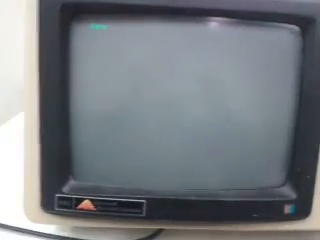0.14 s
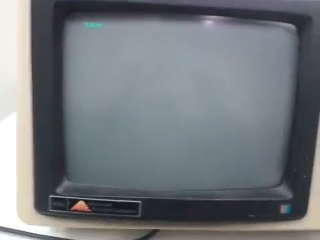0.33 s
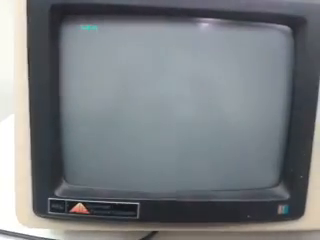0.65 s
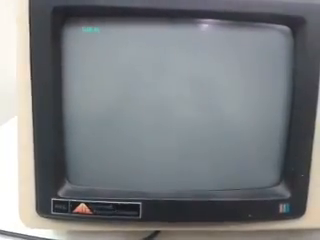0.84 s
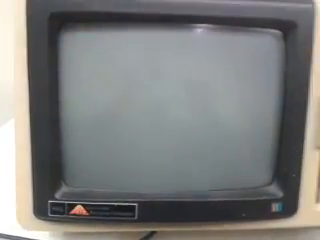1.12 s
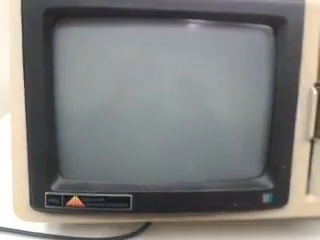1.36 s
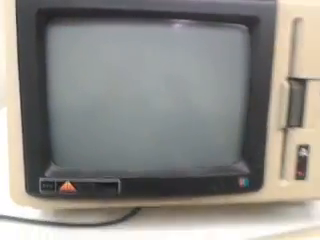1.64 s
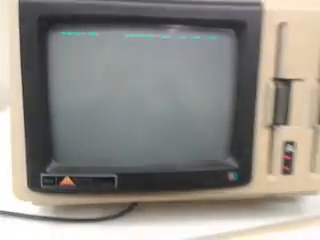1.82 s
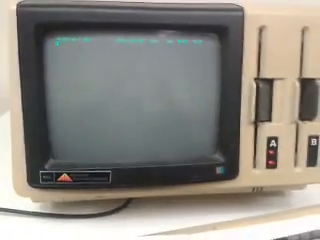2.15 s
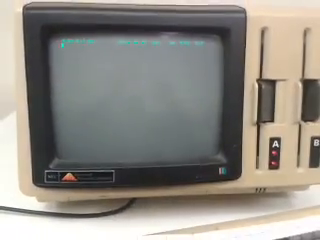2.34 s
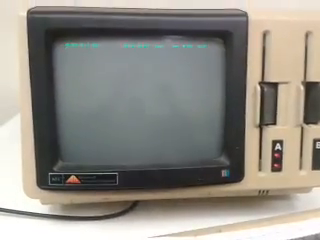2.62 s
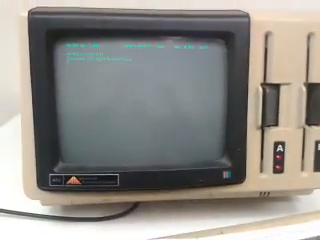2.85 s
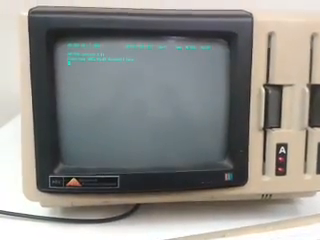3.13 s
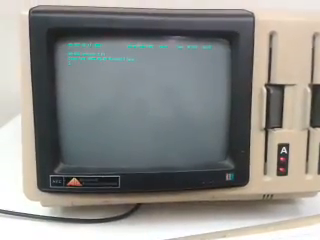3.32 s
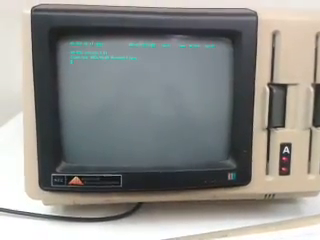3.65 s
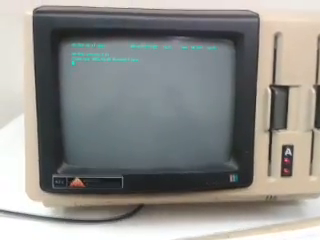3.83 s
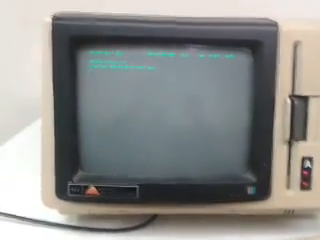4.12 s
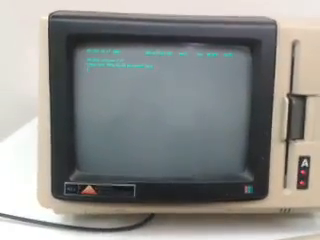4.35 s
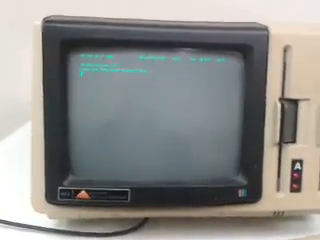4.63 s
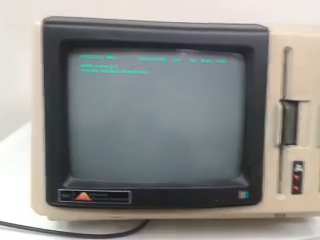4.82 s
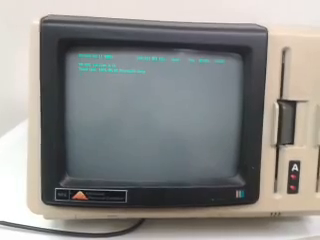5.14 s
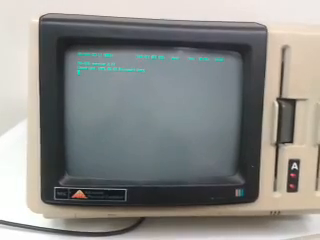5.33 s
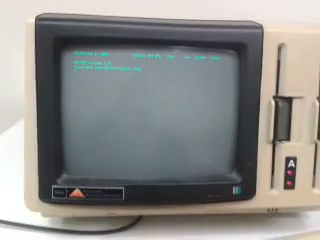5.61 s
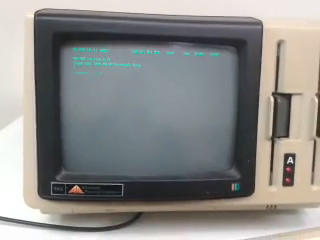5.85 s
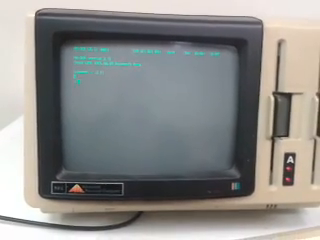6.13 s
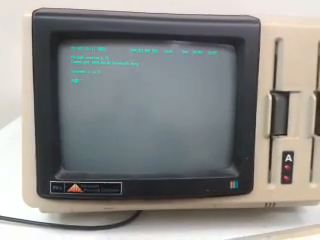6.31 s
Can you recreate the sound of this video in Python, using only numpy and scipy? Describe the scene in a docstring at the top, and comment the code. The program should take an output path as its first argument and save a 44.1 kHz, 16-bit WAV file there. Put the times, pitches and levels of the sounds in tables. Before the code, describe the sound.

An old desktop computer runs close by in a small room, with a faint, steady fan hiss, hum and thin motor whine. Its floppy drive gives short, irregular clicks as the head moves. Two sharper clacks with a slight metallic ring come in the first half, and the later clicks lengthen into tiny rasps. The hand-held microphone picks up soft rubs and a quick cluster of sharp ticks past the middle.

```python
"""Floppy drive of an old desktop computer booting, close by in a small room.
A stepper drags the head a few tracks at a time; twice the head clacks down. Both ring the drive and case.
Underneath: fan air, mains hum, motor whine. The hand-held microphone ticks and rubs as it moves."""
import sys
import numpy as np
from scipy import signal
from scipy.fft import irfft
from scipy.io import wavfile

SR = 44100
rng = np.random.default_rng(int(sys.argv[2]) if len(sys.argv) > 2 else 0)


def waveform_to_disk(signal):
    """Save audio, clipped to [-1, 1], as 16-bit WAV at the path in sys.argv[1]."""
    frames = np.transpose(np.atleast_2d(signal))
    scaled = np.clip(frames, -1, 1) * 32767
    samples = np.round(scaled).astype(np.int16)
    wavfile.write(sys.argv[1], SR, samples)


N = 285309
T = np.arange(N) / SR
RING_SAMPLES, ATTACK_SAMPLES = int(.6 * SR), int(.04 * SR)
RING_T = T[:RING_SAMPLES]
STEP_HZ = 251.67

# fan and room air: freq_hz, density_db
AIR_SPECTRUM = [(15, 17.5), (38, -2), (55, -17), (80, -14), (108, -20.5), (150, -11.5), (280, -0.5),
                (560, 4), (1100, -1), (2400, -5.5), (4500, -12), (7100, -13), (8000, -47.5)]
# mains and fan tones: pitch_hz, level_db
HUM_TONES = [(50, -78), (150, -87), (188, -81), (200, -78), (301, -71), (400, -82.5), (490, -69),
             (587, -63), (4140, -79.5)]
# motor whine: harmonic, level_re_air_db
WHINE_HARMONICS = [(7, -16), (8, -15), (9, -14), (10, -20), (11, -20), (12, -24.5), (13, -20), (14, -23)]
# air and whine at the moving microphone: time_s, gain_db
MACHINE_GAIN = [(0, -57.5), (1.5, -58.5), (3.3, -58), (4.4, -58), (5.3, -60.5), (5.9, -59.5), (6.4, -56.5)]
# microphone ticks: start_s, peak_db, centre_hz
TICKS = [(4.041, -40, 6240), (4.074, -32, 5630), (4.094, -21.5, 4250), (4.136, -17, 4900),
         (5.438, -38.5, 4800)]
# hand rubs and bumps: start_s, length_s, level_db, centre_hz
RUBS = [(0, 0.23, -60, 41), (.01, 0.09, -47, 710), (0.402, 0.59, -58, 806), (1.293, 0.047, -57.5, 6500),
        (1.296, 0.047, -48, 1080), (4.03, 0.078, -51.5, 6650), (4.11, 0.027, -49.5, 6500),
        (4.254, 0.64, -63, 5800), (6.142, 0.39, -58.5, 4570)]
# room reflections: freq_hz, density_db
ROOM_SPECTRUM = [(90, -40.5), (135, 1.5), (230, -25), (350, 9.5), (500, 1.5), (900, 6.5), (2500, -12.5),
                 (7000, -14.5), (9000, -10.5), (10000, -54)]
# room decay: freq_hz, t60_s
ROOM_DECAY = [(130, 0.3), (300, 0.39), (700, 0.24), (1800, 0.25), (6000, 0.24)]
# drive and case modes: pitch_hz, gain_db
CASE_MODES = [(130, -22), (346, -2.5), (440, -13.5), (548, -1), (630, -3), (746, 1), (795, 3), (845, 0.5),
              (985, -12.5), (1080, -7), (1245, -31), (1370, -5.5), (1570, -11), (1675, -4), (1790, -14.5),
              (1995, -9.5), (2155, -11.5), (2260, -19.5), (2530, -5), (2665, -9), (2815, 2.5), (6950, 9)]
# dense resonances of small parts: freq_hz, density_db
PARTS_SPECTRUM = [(120, -59.5), (230, -34), (400, -8), (800, -2), (1500, -8), (2800, -6), (3400, -6),
                  (4800, -8), (6000, -4.5), (7000, -7), (9000, 4), (10000, -34)]
# head arm spring: pitch_hz, gain_db, t60_s
SPRING_MODES = [(2830, -48, .3), (4795, -46, .16), (5828, -58, .75), (5852, -60, .7), (5905, -59, .6)]
# head landings: start_s, chatter_s, level_db
CLACKS = [(2.0546, 0.0034, -25), (3.012, 0.0059, -27.5)]
# head seeks: start_s, length_s, level_db, mid_over_bass_db
SEEKS = [(0.3221, 0.0027, -37.5, -3), (0.8267, 0.0039, -36.5, -2.5), (1.336, 0.0057, -40, 7),
         (1.825, 0.0059, -36, -0.5), (2.139, 0.0089, -34.5, -0.5), (2.5137, 0.0047, -39.5, -2.5),
         (2.971, 0.011, -34.5, 1), (3.4891, 0.014, -32.5, -1), (3.599, 0.02, -33.5, 2),
         (3.749, 0.014, -33, -2), (4.197, 0.0065, -39, -4), (4.604, 0.028, -35, -2.5),
         (4.9271, 0.02, -35, -5.5), (5.5454, 0.0061, -41.5, -7.5), (5.997, 0.029, -35.5, -2),
         (6.246, 0.021, -33.5, -5.5)]


def amp(db):
    """Decibels to gain."""
    return 10 ** (np.asarray(db) / 20)


def unit(x):
    """Scale to rms 1."""
    return x / np.sqrt(np.mean(x ** 2))


def over_pitch(table, hz):
    """Interpolate (freq_hz, value) rows in log frequency."""
    freq_hz, value = np.transpose(table)
    return np.interp(np.log(hz + 1e-9), np.log(freq_hz), value)


def noise(spectrum, samples):
    """Coloured noise, rms 1."""
    hz = np.fft.rfftfreq(samples, 1 / SR)
    phases = np.exp(2j * np.pi * rng.random(len(hz)))
    return unit(irfft(amp(over_pitch(spectrum, hz)) * phases, samples))


def band(x, low_hz, high_hz=SR / 2, order=2):
    """Band-pass."""
    sos = signal.butter(order, [low_hz, min(high_hz, SR / 2 - 1)], "band", fs=SR, output="sos")
    return signal.sosfilt(sos, x)


def fade(t60_s, hold_s=0):
    """Hold, then exponential decay."""
    return np.exp(-np.log(1000) * np.maximum(RING_T - hold_s, 0) / t60_s)


def ring(modes):
    """Damped sines of alternating sign from (pitch_hz, gain_db, t60_s) rows."""
    return sum((-1) ** k * amp(db) * fade(t60_s) * np.sin(2 * np.pi * hz * RING_T)
               for k, (hz, db, t60_s) in enumerate(modes))


def add(out, start_s, x):
    """Mix x into out."""
    i = int(start_s * SR)
    out[i:i + len(x)] += x[:N - i]


def wander(rate_hz):
    """Slow random drift, rms 1."""
    return noise([(rate_hz, 0), (2 * rate_hz, -20), (10 * rate_hz, -120)], N)


def tone(hz, level_db, waver_db=2):
    """Sine whose level wavers as the microphone moves."""
    rms = amp(level_db + waver_db * wander(7.7))
    cycles = np.cumsum(hz) / SR + rng.random()
    return np.sqrt(2) * rms * np.sin(2 * np.pi * cycles)


def running_machine(air_db=4.5, motor_hz=188, hum_drift=0.00251, motor_drift=0.00074):
    """Hum, plus fan air and motor whine that swell together as the microphone moves."""
    air = noise(AIR_SPECTRUM, N)
    hum = sum(tone(hz * (1 + hum_drift * wander(5.15)), db) for hz, db in HUM_TONES)
    pulse_hz = motor_hz * (1 + motor_drift * wander(2.7))
    whine = sum(tone(harmonic * pulse_hz, db) for harmonic, db in WHINE_HARMONICS)
    gain_db = air_db + np.interp(T, *np.transpose(MACHINE_GAIN))
    return hum + (air + whine) * amp(gain_db)


def handling(tick_t60_s=0.007, tick_span=6.0, rub_span=1.12):
    """Hand ticks and rubs on the microphone, too close to stir the room."""
    out = np.zeros(N)
    for start_s, peak_db, hz in TICKS:
        burst = rng.standard_normal(RING_SAMPLES) * fade(tick_t60_s)
        tick = band(burst, hz / tick_span, hz * tick_span, order=1)
        add(out, start_s, amp(peak_db) * tick / np.abs(tick).max())
    for start_s, length_s, level_db, hz in RUBS:
        rub = unit(band(rng.standard_normal(RING_SAMPLES), hz / rub_span, hz * rub_span, order=1))
        swell = np.sin(np.pi * np.minimum(RING_T / length_s, 1))
        add(out, start_s, amp(level_db) * rub * swell)
    return out


def room(build_s=0.026):
    """Diffuse reflections build and fade by octave, bass last."""
    diffuse = noise(ROOM_SPECTRUM, RING_SAMPLES)
    tail = sum(band(diffuse, hz / np.sqrt(2), hz * np.sqrt(2)) * fade(over_pitch(ROOM_DECAY, hz))
               for hz in 125 * 2. ** np.arange(7))
    return tail * (1 - np.exp(-RING_T / build_s))


def case_response(parts_db, parts_t60_s, build_s, room_db, t60_at_1khz_s=.08):
    """One push spreads through the chassis: damped case modes, small parts, then the room."""
    modes = ring([(hz, db, t60_at_1khz_s / np.sqrt(hz / 1000)) for hz, db in CASE_MODES])
    parts = noise(PARTS_SPECTRUM, RING_SAMPLES) * fade(parts_t60_s)
    direct = (unit(modes) + amp(parts_db) * unit(parts)) * (1 - np.exp(-RING_T / build_s))
    return direct + amp(room_db) * unit(room())


def strike(force, response, levels_db, crossovers_hz=(1150, 3200)):
    """A force rings the case; levels_db sets bass, mid and treble over the attack."""
    ringing = signal.fftconvolve(force, response)[:RING_SAMPLES]
    bass, below_treble = (signal.sosfiltfilt(signal.butter(4, hz, fs=SR, output="sos"), ringing)
                          for hz in crossovers_hz)
    bands = bass, below_treble - bass, ringing - below_treble
    return sum(amp(db) * unit(x) * np.std(x) / np.std(x[:ATTACK_SAMPLES])
               for x, db in zip(bands, levels_db))


def head_blows(landing_db=(-7.5, 1, -1.5), rebound_db=(-10, -6.2, -8), gap_s=.02, rebound_s=0.0172):
    """A landing, then a softer, longer rebound: start_s, chatter_s, (bass_db, mid_db, treble_db)."""
    for start_s, chatter_s, level_db in CLACKS:
        yield start_s, chatter_s, level_db + np.array(landing_db)
        yield start_s + gap_s, rebound_s, level_db + np.array(rebound_db)


def head_clacks(spread_db=6.5, settle_t60_s=0.0084, snap_db=-5, snap_hz=(6400, 7000), spring_db=30.5):
    """The light head arm snaps against its stop, chatters and rings its spring."""
    out = np.zeros(N)
    for start_s, chatter_s, levels_db in head_blows():
        chatter = fade(settle_t60_s, hold_s=chatter_s) * rng.standard_normal(RING_SAMPLES)
        force = chatter * amp(spread_db * rng.standard_normal(RING_SAMPLES))
        response = case_response(parts_db=5.5, parts_t60_s=0.089, build_s=0.00037, room_db=-4)
        case = strike(band(force, low_hz=340), response, levels_db)
        treble_db = levels_db[-1]
        arm = band(force, *snap_hz)
        snap = amp(treble_db + snap_db) * arm / np.std(arm[:ATTACK_SAMPLES])
        spring = amp(treble_db + spring_db) * ring(SPRING_MODES)
        add(out, start_s, case + snap + spring)
    return out


def carriage_rattle(length_s, rise_s=0.0026, settle_t60_s=0.091):
    """The carriage rattles on its rails while moving, then settles."""
    motion = np.minimum(RING_T / rise_s, 1) * fade(settle_t60_s, hold_s=length_s)
    return unit(motion * band(rng.standard_normal(RING_SAMPLES), low_hz=200, order=1))


def rotor_ping(seek_db, hardness_db, pitch_hz=2165, t60_s=0.023, build_s=0.0062, boost_db=28):
    """A hard start pings the rotor fully; the ping drops 3 dB per dB of hardness below zero."""
    ping_db = seek_db + boost_db + 3 * min(hardness_db, 0)
    return ring([(pitch_hz, ping_db, t60_s)]) * (1 - np.exp(-(RING_T / build_s) ** 2))


def step_train(length_s, jitter_s=.00018, first_step_db=-3, max_steps=16):
    """One soft jerk per track, nearly even; the first only takes up slack."""
    steps = np.zeros(RING_SAMPLES)
    times_s = np.arange(0, max(length_s - 0.5 / STEP_HZ, 1 / SR), 1 / STEP_HZ)
    for time_s, (lag, size_db) in zip(times_s, rng.standard_normal((max_steps, 2))):
        i = int(abs(time_s + jitter_s * lag) * SR)
        steps[i] = amp(size_db + first_step_db * (time_s == 0))
    return unit(band(steps, low_hz=520, high_hz=3400, order=1))


def head_seeks(rattle_db=-2, one_step_treble_db=-11, treble_db_per_doubling=3.5):
    """The stepper drags the head and rings the case. Hard starts trade bass for mid; long runs add treble."""
    out = np.zeros(N)
    for start_s, length_s, level_db, hardness_db in SEEKS:
        treble_db = one_step_treble_db + treble_db_per_doubling * np.log2(length_s * STEP_HZ)
        levels_db = level_db + np.array([-hardness_db / 2, hardness_db / 2, treble_db])
        rattle = amp(rattle_db) * carriage_rattle(length_s)
        response = case_response(parts_db=3.5, parts_t60_s=0.11, build_s=0.0025, room_db=-7)
        case = strike(step_train(length_s) + rattle, response, levels_db)
        add(out, start_s, case + rotor_ping(level_db, hardness_db))
    return out


def scene():
    """The drive over the running machine, mono."""
    return (head_seeks() + head_clacks() + handling() + running_machine())[None]


def record(dry):
    """Steep treble cut at 7.2 kHz; a faint edge passes up to 9.2 kHz."""
    treble_cut = signal.ellip(7, .3, 38, 7200, fs=SR, output="sos")
    edge_cut = signal.ellip(8, .3, 70, 9200, fs=SR, output="sos")
    return signal.sosfilt(edge_cut, signal.sosfilt(treble_cut, dry))


dry = scene()
out = record(dry)
waveform_to_disk(out)
```